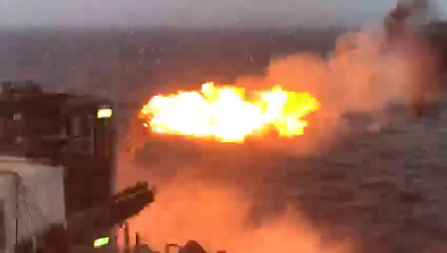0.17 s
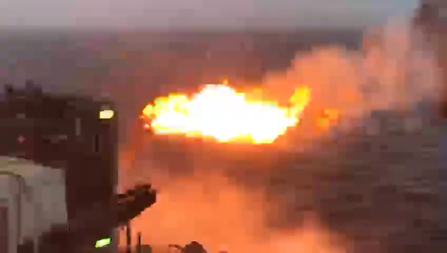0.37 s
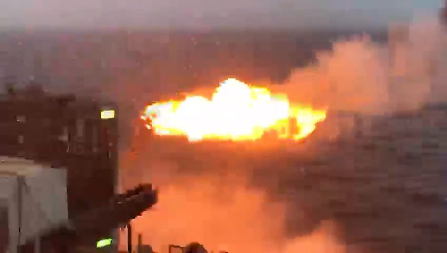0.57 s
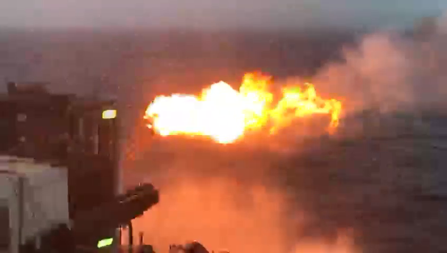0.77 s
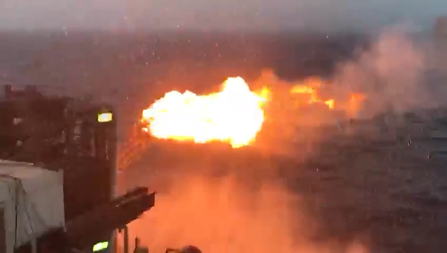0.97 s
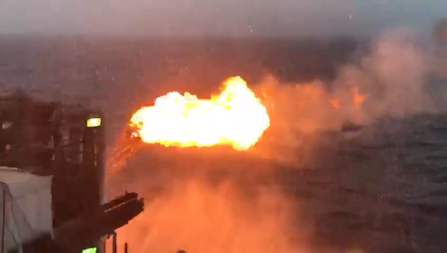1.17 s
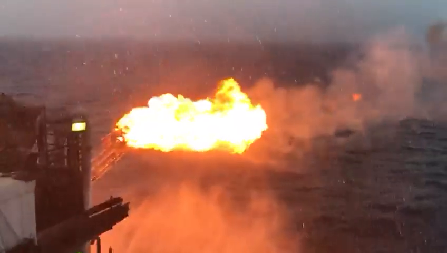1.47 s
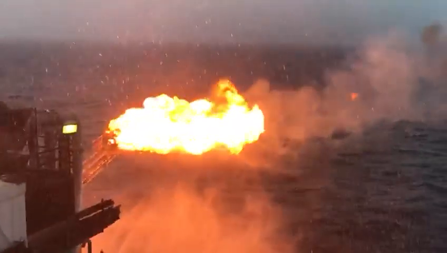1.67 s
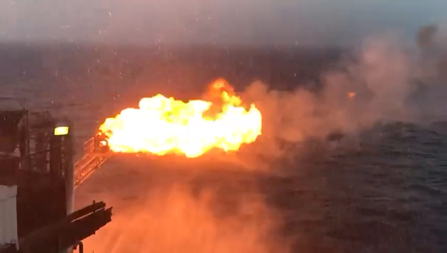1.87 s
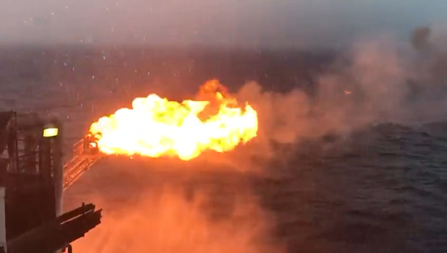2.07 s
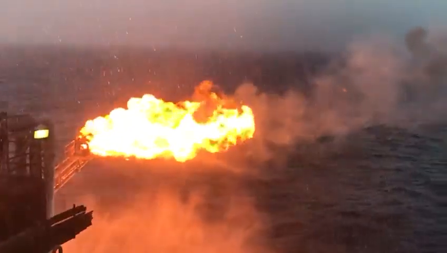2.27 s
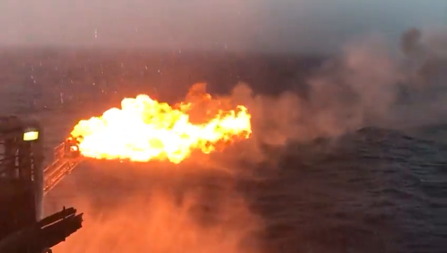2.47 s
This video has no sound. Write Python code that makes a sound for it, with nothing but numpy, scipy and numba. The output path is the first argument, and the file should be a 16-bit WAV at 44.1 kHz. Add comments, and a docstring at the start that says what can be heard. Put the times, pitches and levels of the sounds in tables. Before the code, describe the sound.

Continuous roar of a big burning gas jet, heard from a deck at sea; sudden ragged start, grainy rush and hiss, wind thumping the microphone, then the highs drop away, leaving dull roar and deep rumble.

```python
"""A large gas flare roars over open sea, heard from a vessel; the sound cuts in abruptly with a ragged flutter.
The flame is shot noise mixed with smooth turbulence, shaped into a roar and a low body, over a deep noise rumble.
The jet adds a grainy rush and hiss in surges; wind eddies, a resonance driven by noise, buffet the microphone
in gusts and deepen as the wind drops. The treble closes in steps and leaves a muffled roar."""
import sys
import numpy as np
from scipy.fft import rfft, irfft
from scipy.io import wavfile
from scipy.ndimage import uniform_filter1d
from numba import njit

SR = 44100
rng = np.random.default_rng(int(sys.argv[2]) if len(sys.argv) > 2 else 0)


def materialize(psi):
    """Save the field psi as 16-bit PCM at rate SR to the path in sys.argv[1].

    A 1-D psi becomes a single channel; in a 2-D psi each row is a channel.
    """
    bounded = np.clip(np.atleast_2d(psi).T, -1, 1)
    quanta = np.round(bounded * 32767).astype(np.int16)
    wavfile.write(sys.argv[1], SR, quanta)


N = 115983
TIME = np.arange(N) / SR
BINS = np.maximum(np.arange(N // 2 + 1) * SR / N, 1)  # bin frequencies [Hz]

# Spectrum of the deep rumble, also of the floor: (frequency [Hz], relative density [dB])
RUMBLE_SPECTRUM = [(2, -31.5), (6, -4), (11, -10), (18, 1), (32, -12), (50, -25.5), (100, -50),
                   (250, -61.5)]
PULSES_PER_S = 1100  # mean pulse rate in flame and jet


def from_db(db):
    """Amplitude ratio: 20 dB is a factor of ten."""
    return 10 ** (np.asarray(db) / 20)


def rms_one(x):
    """Normalization: scale to unit mean-square power."""
    return x / np.sqrt(np.mean(x ** 2) + 1e-20)


def in_time(rows, axis=1):
    """Linear interpolation of one column of a control curve at every sample."""
    columns = np.transpose(rows)
    return np.interp(TIME, columns[0], columns[axis])


def coloured(x, spectrum):
    """Linear filtering: an excitation takes on a spectrum drawn over log frequency; unit power."""
    hz, db = np.transpose(spectrum)
    gain = from_db(np.interp(np.log(BINS), np.log(hz), db))
    roll_off = np.sqrt(1 + (BINS / hz[-1] / 2) ** 4)  # beyond the last row
    return rms_one(irfft(rfft(x) * gain / roll_off, N))


def below(x, hz):
    """Steep low-pass: the gain falls to zero within a band 2 % of the edge frequency wide."""
    return irfft(rfft(x) * np.clip((1 - BINS / hz) * 50 + .5, 0, 1), N)


def drift(rate_hz):
    """Low-pass random process: slow fluctuation of unit spread, without content at or below 1 Hz."""
    spectrum = rfft(rng.standard_normal(N)) / (1 + (BINS / rate_hz) ** 2)
    return rms_one(irfft(spectrum * (BINS > 1), N))


def steadied(x, span_s):
    """Envelope normalization: dividing by the running RMS lets the level curve rule."""
    power = uniform_filter1d(x ** 2, max(int(span_s * SR), 2))
    return x / np.sqrt(power + 1e-12)


def swells(rows):
    """Amplitude modulation: the sum of Gaussian swells of level [dB]."""
    return sum(db * np.exp(-((TIME - s) / half) ** 2) for s, db, half in rows)


def shot_noise(pulses_per_s, share):
    """Poisson process: random pulses of uneven size hold a share of the power, smooth turbulence the rest."""
    size_db = 2 * np.minimum(rng.exponential(1, N), 4)
    pulses = (rng.random(N) < pulses_per_s / SR) * from_db(size_db)
    turbulence = rng.standard_normal(N)
    return np.sqrt(share) * rms_one(pulses - pulses.mean()) + np.sqrt(1 - share) * turbulence


def flutter():
    """Sparse shot noise: hard pulses at a low rate sound ragged, under an exponential rise and fall."""
    # spectrum: (frequency [Hz], relative density [dB])
    flutter_spectrum = [(70, -10), (150, 0), (260, 3), (420, 9.5), (650, 5), (1120, -2), (1700, -25.5),
                        (4000, -54.5)]
    peak_s, peak_db = 0.11, -12.5
    rise_db_per_s, fall_db_per_s = 170, 135.5
    age = TIME - peak_s
    swell_db = np.minimum(rise_db_per_s * age, -fall_db_per_s * age)
    pulses = coloured(shot_noise(520, share=0.97), flutter_spectrum)
    return from_db(peak_db + swell_db) * steadied(pulses, span_s=0.053)


def flame(churn_db=0.42):
    """Combustion noise: pockets of gas ignite as pressure pulses; roar and body churn together over a rumble."""
    # levels before trim and churn: (time [s], level [dB])
    roar_level = [(.1, -33), (.3, -26), (.44, -26), (.68, -27.5), (.77, -22.5), (.87, -26.5), (.95, -21),
                  (1.2, -22.5), (1.5, -22), (1.85, -23.5), (2.25, -23), (2.62, -19.5)]
    body_level = [(.1, -19.5), (.28, -24), (.42, -31.5), (.64, -20), (.8, -25), (.95, -33.5), (1.3, -22.5),
                  (1.45, -20.5), (1.72, -19), (2, -19.5), (2.2, -20), (2.4, -21), (2.62, -21.5)]
    rumble_level = [(.1, -47.5), (1.0, -39), (1.25, -18.5), (1.35, -16), (1.58, -13.5), (1.78, -22.5),
                    (1.92, -12.5), (2.14, -20), (2.35, -19), (2.63, -22)]
    # spectra: (frequency [Hz], relative density [dB])
    roar_spectrum = [(120, -19.5), (250, -13.5), (400, 0), (600, 1), (950, -2.5), (1400, -10), (2200, -28),
                     (4000, -44)]
    body_spectrum = [(30, -11.5), (60, -7.5), (90, 3), (125, 0), (190, 1.5), (280, 0.5), (400, -7),
                     (700, -20.5)]
    # puffs in which the plume billows: (time [s], swell [dB], half length [s])
    puffs = [(.357, 5.5, .01), (.553, 5, 0.0086), (.647, 4.5, .012), (.736, 7, .011), (.945, 3, 0.014),
             (1.38, 1.5, .012), (1.51, 2, .02), (2.225, 1.5, 0.013)]
    roar_trim_db, body_trim_db, rumble_trim_db = -1, -1.5, -1.5
    pulse_share = 0.34
    churn = churn_db * drift(25) + swells(puffs)
    roar = steadied(coloured(shot_noise(PULSES_PER_S, pulse_share), roar_spectrum), span_s=0.04)
    body = steadied(coloured(shot_noise(PULSES_PER_S, pulse_share), body_spectrum), span_s=0.052)
    rumble = steadied(coloured(rng.standard_normal(N), RUMBLE_SPECTRUM), span_s=0.75)
    roar = roar * from_db(in_time(roar_level) + roar_trim_db + churn)
    body = body * from_db(in_time(body_level) + body_trim_db + churn)
    rumble = rumble * from_db(in_time(rumble_level) + rumble_trim_db)
    return roar + body + rumble


def dulling(x, from_s, above_hz, db_per_s):
    """Frequency-dependent decay: the upper part of a noise fades exponentially from a given moment."""
    dull = irfft(rfft(x) / (1 + (BINS / above_hz) ** 6), N)
    return dull + (x - dull) * from_db(-db_per_s * np.maximum(TIME - from_s, 0))


def jet(rush_flicker_db=1.0, hiss_flicker_db=0.83, rush_grain=.3, hiss_grain=0.071):
    """Jet noise: broadband rush and hiss, grainy, surge and flicker together; the top of the hiss fades first."""
    # levels before trim, surge and flicker: (time [s], level [dB])
    rush_level = [(.1, -27), (.22, -31), (.35, -27), (.48, -24.5), (.6, -28.5), (.75, -24.5), (.87, -28.5),
                  (.98, -24.5), (1.08, -26), (1.345, -24.5), (1.375, -33), (1.65, -37), (1.88, -33),
                  (2.08, -38), (2.35, -33), (2.62, -26.5)]
    hiss_level = [(.1, -25), (.22, -24.8), (.38, -23.5), (.48, -21), (.55, -20.5), (.61, -23.5), (.7, -23),
                  (.8, -27), (.92, -26), (1.06, -31), (1.17, -32), (1.23, -34.5), (1.35, -30.5),
                  (1.42, -33)]
    # spectra: (frequency [Hz], relative density [dB])
    rush_spectrum = [(600, -29.5), (1000, 2), (1400, 3), (2000, 1), (2600, -1), (3100, -6), (4000, -18),
                     (5000, -13), (7000, -37), (9000, -38)]
    hiss_spectrum = [(1500, -25), (2500, -6), (3200, 2.5), (3900, 2), (4700, -2.5), (6200, -1.5),
                     (7600, -6), (9500, -8), (10400, -11.5), (11500, -12.5)]
    # surges of the jet: (time [s], swell [dB], half length [s])
    surges = [(.112, 3.5, 0.016), (.312, 3.5, 0.01), (.45, 0.5, 0.011), (.542, -1, 0.012),
              (.675, 2.5, 0.017), (.882, 3.5, 0.008), (1.008, 6.5, 0.028), (1.13, 3, .035)]
    rush_trim_db, hiss_trim_db = 1, 0.5
    rush_follows = .45  # share of a surge that reaches the rush
    flicker, surge = drift(45), swells(surges)
    rush = coloured(shot_noise(PULSES_PER_S, rush_grain), rush_spectrum)
    hiss = coloured(shot_noise(PULSES_PER_S, hiss_grain), hiss_spectrum)
    hiss = dulling(hiss, from_s=0.76, above_hz=4400, db_per_s=4.5)
    rush_db = in_time(rush_level) + rush_trim_db + rush_follows * surge + rush_flicker_db * flicker
    hiss_db = in_time(hiss_level) + hiss_trim_db + surge + hiss_flicker_db * flicker
    return rush * from_db(rush_db) + hiss * from_db(hiss_db)


def patchy(x, depth_db, rate_hz):
    """Independent band modulation: eddies of different sizes make each narrow band swell and sink on its own."""
    spectrum, out = rfft(x), 0
    # position among 31 overlapping bands, evenly spaced in log frequency from 100 Hz to 12 kHz
    place = np.clip(np.log(BINS / 100) / np.log(120) * 30, 0, 30)
    for k in range(31):
        band = irfft(spectrum * np.maximum(1 - abs(place - k), 0), N)
        out = out + band * from_db(depth_db * drift(rate_hz))
    return out


@njit
def eddies(noise, hz, damping, top_ratio):
    """Driven oscillator: noise through a broad resonance and a low-pass that both follow the eddy rate."""
    out = np.zeros(len(noise))
    low = band = smooth = slope = 0.
    for i in range(len(noise)):
        w = 2 * np.pi * hz[i] / SR
        low += w * band
        band += w * (noise[i] - low - damping * band)
        smooth += w * top_ratio * slope
        slope += w * top_ratio * (band - smooth - slope)
        out[i] = smooth
    return out


def wind():
    """Eddy shedding: slower air sheds slower eddies at the microphone; the largest are push-pull thumps."""
    # buffeting, level before trim and gusts: (time [s], level [dB], eddy rate [Hz])
    wind_level = [(.1, -19, 67), (.33, -17.5, 73), (.4, -21.5, 75), (.5, -17, 75), (.56, -11.5, 81),
                  (.68, -16.5, 62), (.75, -16, 78), (.85, -17.5, 80), (.93, -14, 56), (1.0, -17.5, 54),
                  (1.17, -14, 43), (1.26, -23, 25), (1.45, -22, 19), (1.75, -26, 16), (2.05, -23.5, 17),
                  (2.2, -21, 28), (2.43, -21.5, 41), (2.62, -17, 41)]
    # gusts that swell the buffeting: (time [s], swell [dB], half length [s])
    gusts = [(.255, 7.5, 0.011), (.335, 5.5, 0.013), (.452, 7.5, 0.013), (.556, 0, 0.013),
             (.615, 7.5, 0.0083), (.688, 7.5, 0.024), (.908, 1.5, 0.013), (.945, 4.5, 0.013),
             (.99, 4, .012)]
    # single eddies: (time [s], height [dB], width [s])
    thumps = [(0.612, -6.5, 0.0028), (.902, -8, 0.0027), (1.342, -10, 0.0069), (1.565, -10.5, .016),
              (2.247, -7.5, 0.011)]
    wind_trim_db = -1
    # low-pass edge is relative to the eddy rate
    buffeting = eddies(rng.standard_normal(N), in_time(wind_level, axis=2), damping=0.7, top_ratio=2.51)
    level_db = in_time(wind_level) + wind_trim_db + swells(gusts)
    out = steadied(buffeting, span_s=0.031) * from_db(level_db)
    for s, db, width in thumps:
        phase = (TIME - s) / width
        out = out - from_db(db) * phase * np.exp((1 - phase ** 2) / 2)
    return out


def scene():
    """Superposition: flare, flutter and wind cut in over a faint low floor; steelwork reflects the flare once."""
    start_s, echo_s, echo_db, floor_db = 0.083, .0135, -19.5, -73.5
    flare = patchy(flame() + jet(), depth_db=1.12, rate_hz=7.8)
    flare = flare + from_db(echo_db) * np.interp(TIME - echo_s, TIME, flare)
    opened = np.clip((TIME - start_s) / .002, 0, 1)
    floor = from_db(floor_db) * coloured(rng.standard_normal(N), RUMBLE_SPECTRUM)
    return (opened * (flare + flutter() + wind()) + floor)[None]


def record(dry):
    """Saturation and low-pass: peaks round off under full scale, the treble closes in steps, the top is cut."""
    # treble edge, each step crossfaded: (start [s], upper edge [Hz])
    treble_edge = [(0, 11800), (.96, 11340), (1.048, 9210), (1.18, 6910), (1.355, 3056)]
    step_s, cutoff_hz = 0.031, 12053
    loud = dry[0] / (1 + (dry[0] / .96) ** 8) ** (1 / 8)
    out = loud
    for s, hz in treble_edge:
        fade = np.clip((TIME - s) / step_s + .5, 0, 1)
        out = (1 - fade) * out + fade * below(loud, hz)
    return below(out, cutoff_hz)[None]


dry = scene()
out = record(dry)
materialize(out)
```